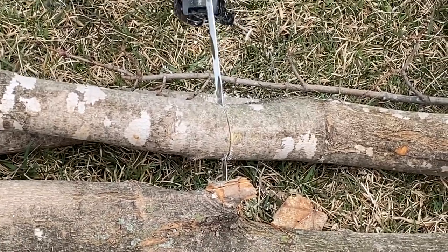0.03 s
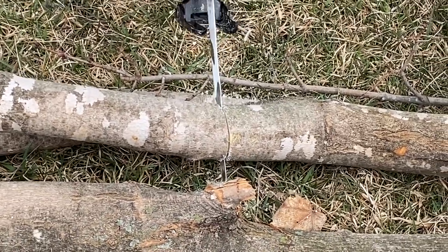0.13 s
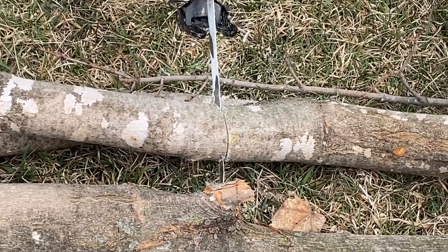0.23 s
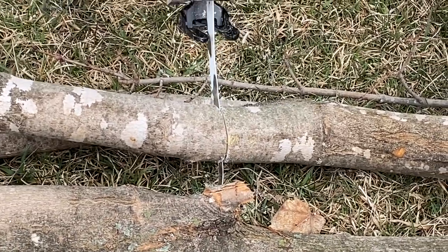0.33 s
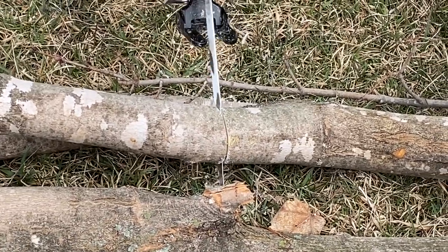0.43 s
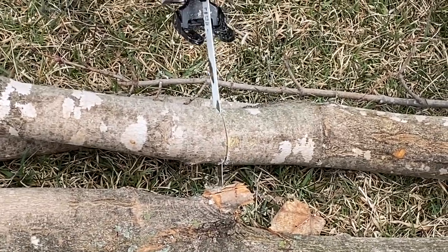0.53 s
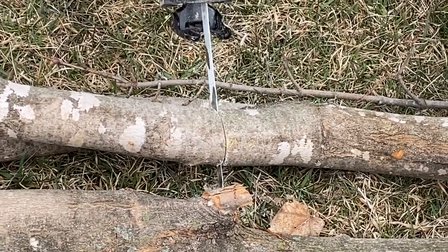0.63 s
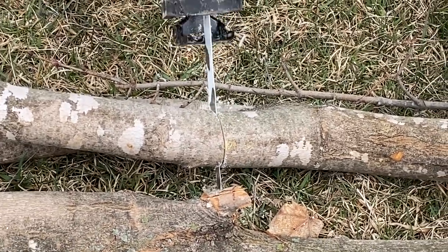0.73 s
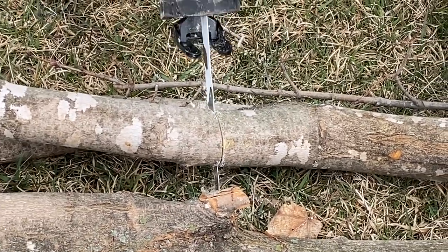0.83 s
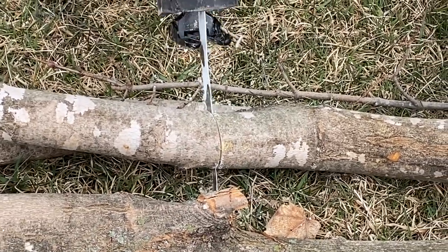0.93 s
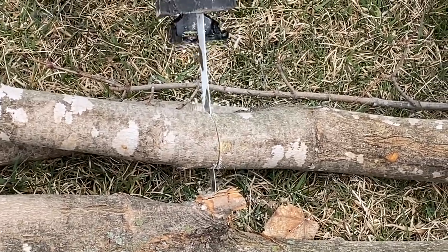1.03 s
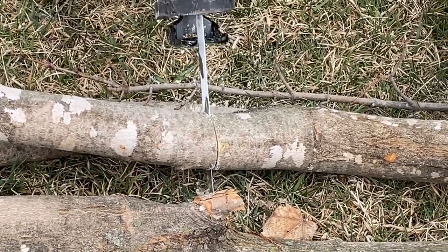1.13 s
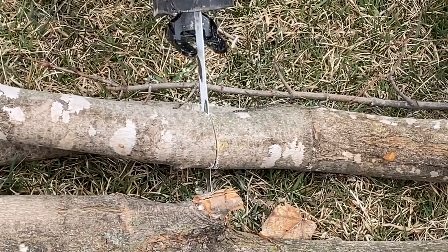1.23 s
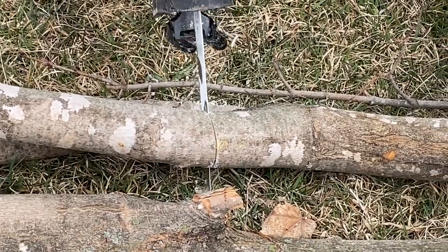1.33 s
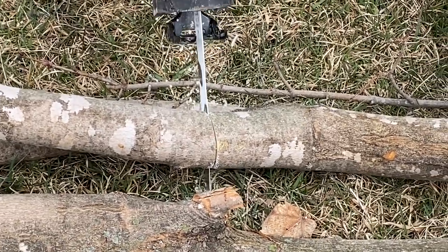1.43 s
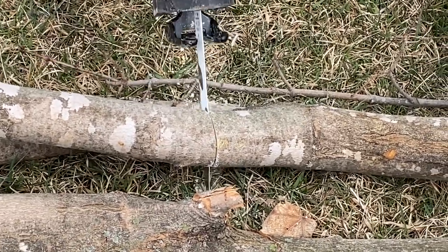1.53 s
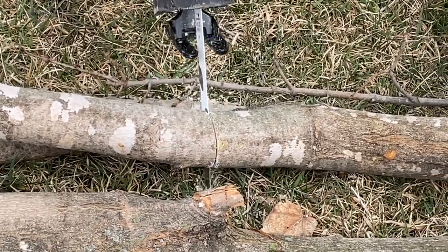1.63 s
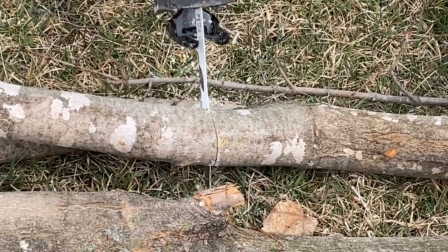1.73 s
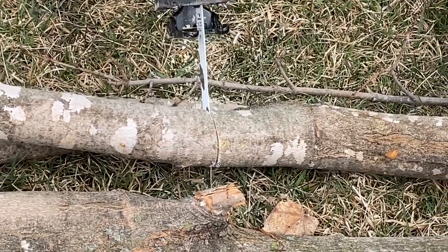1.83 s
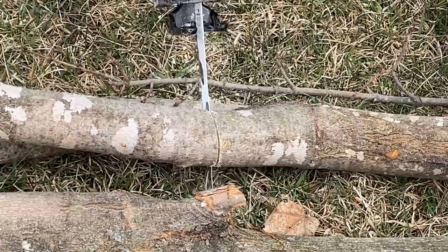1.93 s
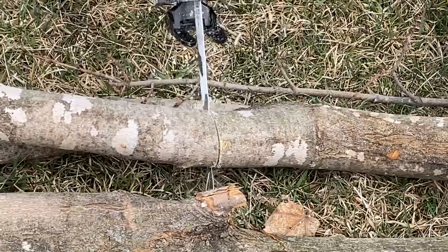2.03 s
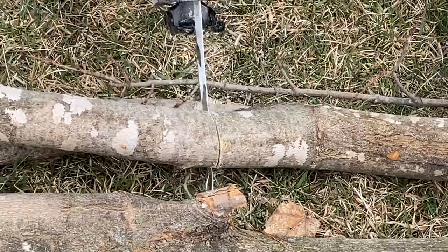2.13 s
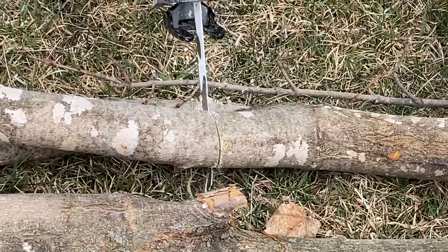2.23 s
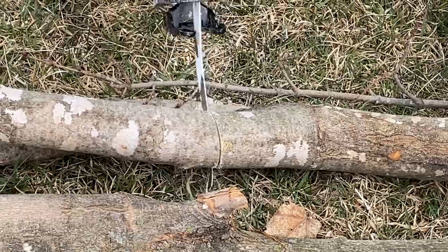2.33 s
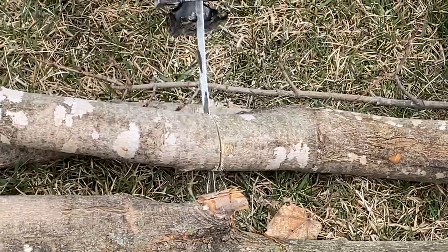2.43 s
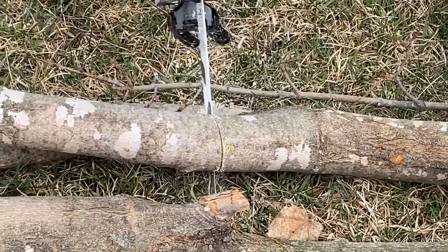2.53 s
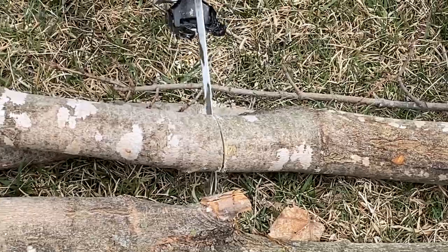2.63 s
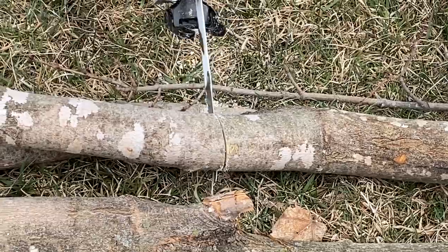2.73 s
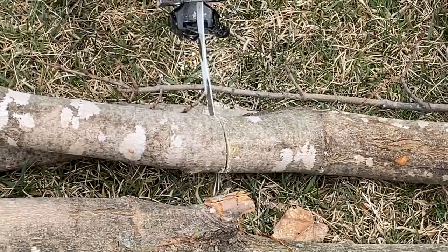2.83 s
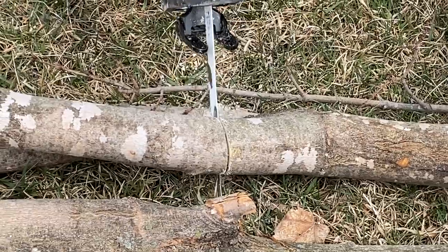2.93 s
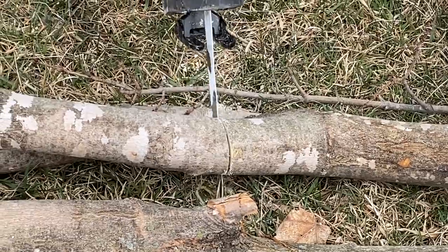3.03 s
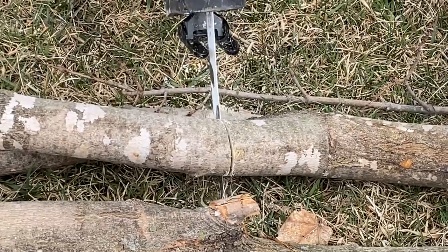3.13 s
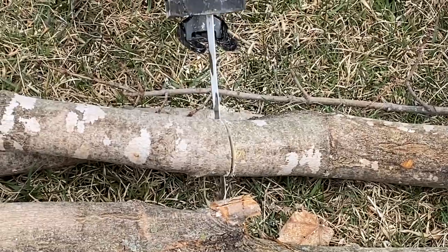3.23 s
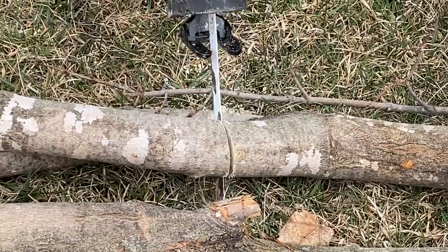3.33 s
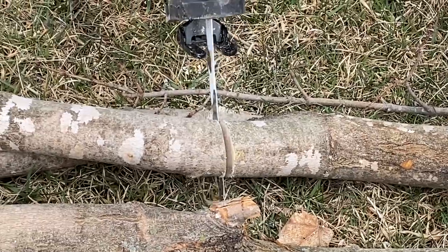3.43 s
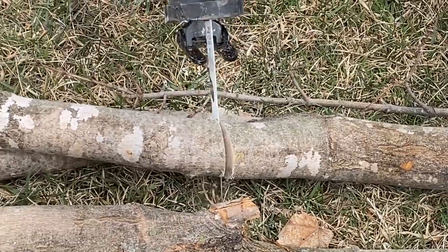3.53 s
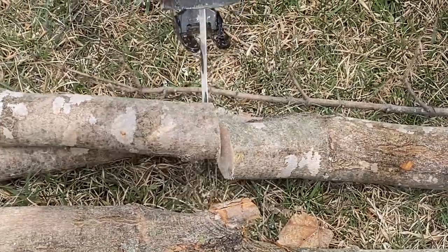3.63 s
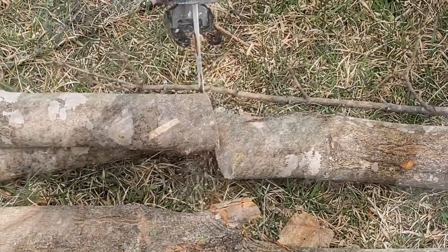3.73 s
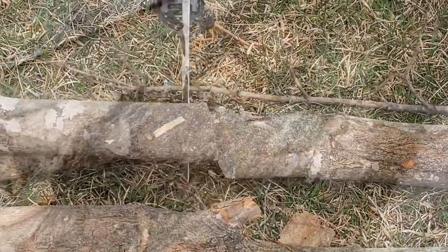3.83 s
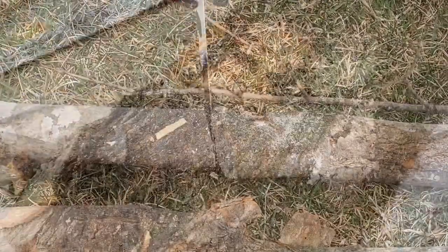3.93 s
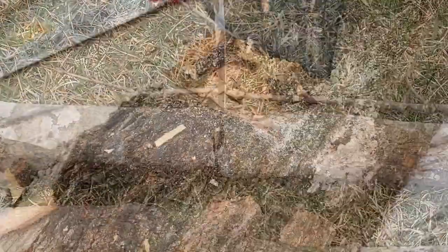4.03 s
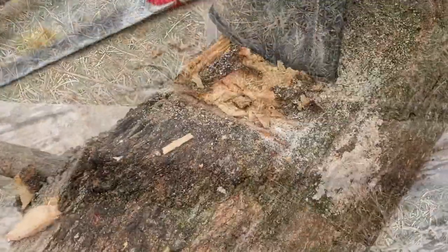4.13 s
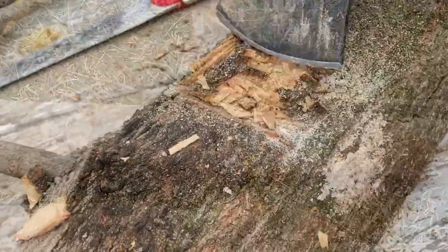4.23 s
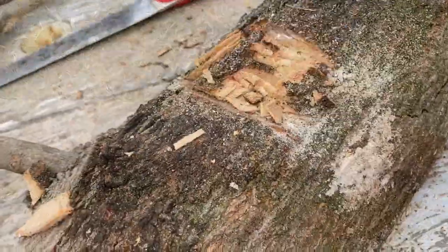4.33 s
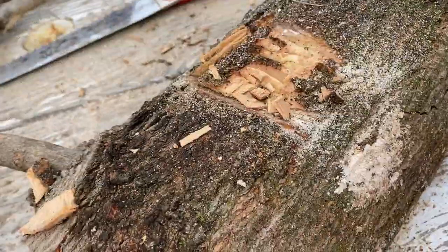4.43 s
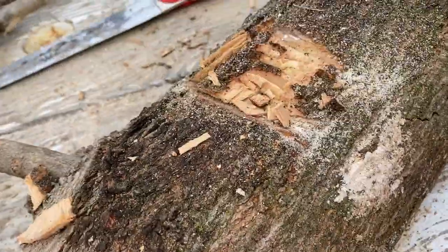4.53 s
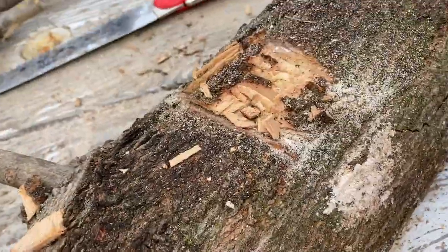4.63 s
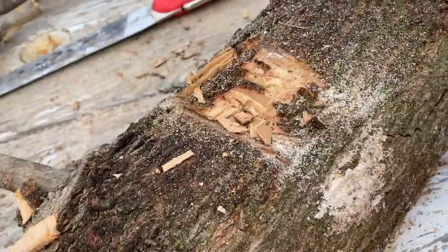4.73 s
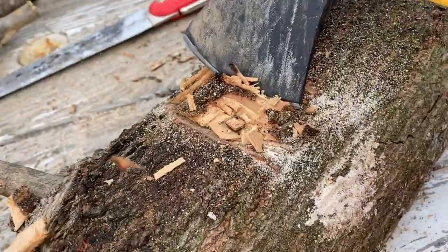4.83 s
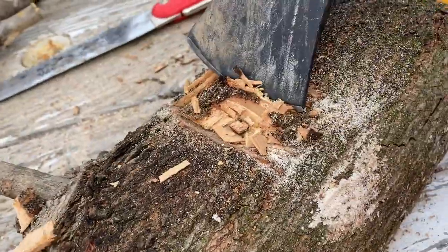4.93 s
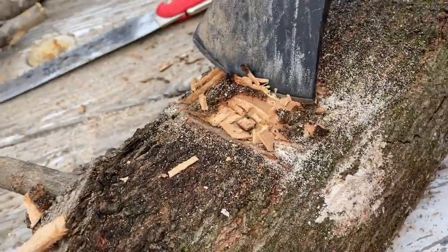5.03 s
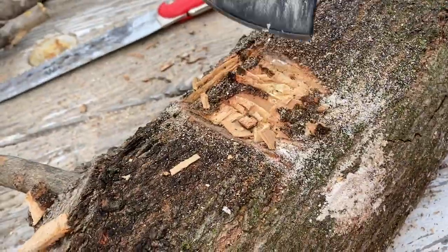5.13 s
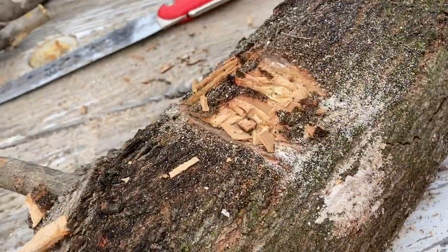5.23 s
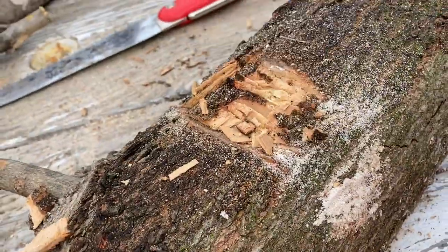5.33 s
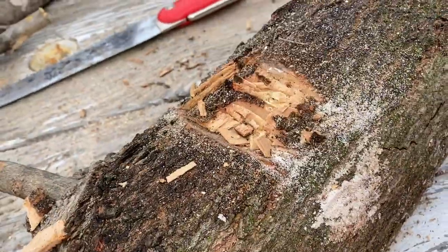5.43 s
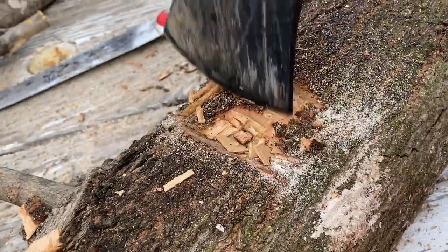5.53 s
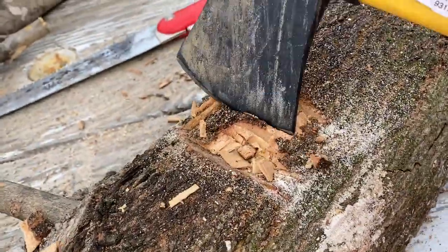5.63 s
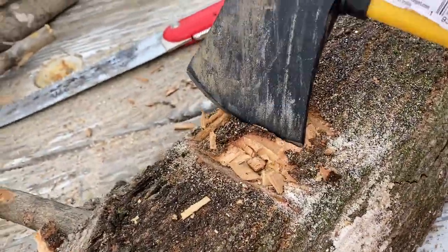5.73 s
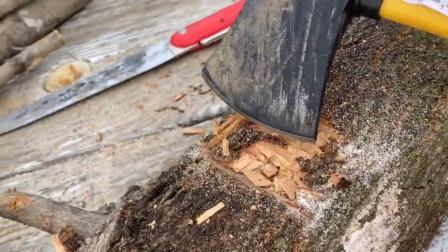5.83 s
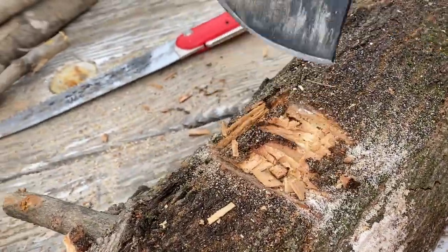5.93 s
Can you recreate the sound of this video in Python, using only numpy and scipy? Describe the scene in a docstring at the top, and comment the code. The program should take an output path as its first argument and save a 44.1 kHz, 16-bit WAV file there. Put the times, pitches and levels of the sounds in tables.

```python
"""First comes the rattling buzz of a reciprocating saw cutting a branch, close to a phone on a lawn.
Each turn of its crank knocks at both ends of the stroke, whips the blade and drags the teeth through
the cut, while puffs of air thud on the microphone. The saw fades out. Three hatchet chops into a log
on a wooden deck overload the microphone, and splinters crackle. Behind it all the yard rumbles
softly, and a far bird chirps once."""
import sys
import numpy as np
from scipy import signal
from scipy.fft import rfft, irfft
from scipy.io import wavfile
from scipy.ndimage import map_coordinates

SR = 44100
rng = np.random.default_rng(int(sys.argv[2]) if len(sys.argv) > 2 else 0)


def wrap_up_sound(samples):
    """Save the sound to the file named by the first command line argument, as 16-bit audio."""
    columns = np.atleast_2d(samples).T
    # keep every value between -1 and 1, then stretch to whole-number steps
    tamed = np.clip(columns, -1, 1)
    steps = np.round(tamed * 32767).astype(np.int16)
    wavfile.write(sys.argv[1], SR, steps)


N = 264600
T = np.arange(N) / SR
FREQ = np.maximum(np.arange(N // 2 + 1) * SR / N, 1)

# tone of the yard's rumble, of rustling and of air on the microphone: (frequency [Hz], level [dB])
RUMBLE_COLOUR = [(20, -15.5), (40, 3.5), (65, 8.5), (110, 0.5), (200, -10), (400, -25), (800, -37.5),
                 (2000, -69.5)]
RUSTLE_COLOUR = [(200, 0), (700, 5), (1200, 1), (2000, 3), (3200, -1.5), (4500, -3), (6500, -1),
                 (9000, -15.5), (11000, -5.5), (16000, -18)]
BUFFET_COLOUR = [(15, -22), (35, -14), (65, 2), (100, -6.5), (150, -7.5), (250, -17), (500, -36.5),
                 (1500, -77.5)]
# a far bird's chirp: (time [s], pitch [Hz], level [dB])
BIRD = [(5.305, 3700, -91), (5.318, 3900, -58), (5.333, 4700, -68), (5.347, 3930, -49), (5.362, 3450, -54),
        (5.378, 3300, -87)]
# puffs of air on the microphone: (time [s], level [dB], half-width [s])
PUFFS = [(.745, -22, 0.021), (.99, -24.5, 0.029), (1.065, -22, 0.029), (1.18, -17.5, 0.03),
         (1.3, -23.5, 0.039), (1.529, -12, 0.016), (1.92, -18.5, 0.092), (2.105, -15, 0.024),
         (2.17, -15.5, 0.021), (2.45, -15, 0.016), (2.695, -13, 0.016), (2.79, -19, 0.096),
         (2.944, -15.5, 0.028), (3.34, -24.5, 0.013), (3.49, -30.5, .018), (3.71, -27, 0.029),
         (3.84, -27, 0.089)]

# hatchet blows: (time [s], thump [dB], crack [dB], crack brightness [dB per octave], log pitch [ratio],
# splinters [dB], after-ring [dB], bounce delay [s], bounce [dB], rocking [dB])
CHOPS = [(4.045, -0.5, -6.5, 0.1, 0.98, -34, -38, 0.051, -13.5, -22),
         (4.7673, 5, 4.5, -.5, .995, -28.5, -40, .044, -17, -25.5),
         (5.5399, 2.5, -2.5, 2.5, 1.06, -32, -33, 0.051, -23, -36)]
# ringing notes of the log on its boards, the long, low after-ring and the steel head:
# (pitch [Hz], level [dB], time to fade by 60 dB [s])
LOG_MODES = [(63, -6, 0.17), (81.5, -2, 0.16), (111.2, -3.5, 0.19), (167.4, -6, 0.17), (198.6, -3, 0.069),
             (311.5, -9, 0.14), (404, -19, 0.14), (546, -6, 0.058), (636, -7, 0.058), (747, -5.5, 0.047),
             (1230, -13, 0.016), (1516, -30.5, 0.09), (3800, -41, 0.002)]
AFTER_RING = [(275, -0.5, 1.7), (294, 2.5, 1.45), (419, -11.5, 1.5)]
STEEL_MODES = [(1776, -14, .15), (2875, -4, .18), (3402, -2, .18), (4134, -4, .2), (6054, -18, .35),
               (10800, -2, .16)]
# tone of the wood cracking and of its chips: (frequency [Hz], level [dB])
CRACK_COLOUR = [(200, -21), (700, 11.5), (1500, 3), (2500, 0), (3600, 8.5), (4700, -2), (7500, 4),
                (11000, -4), (16000, 3)]
CHIP_COLOUR = [(300, -16), (1000, -5.5), (2000, 2), (3000, -6), (5000, -7.5), (8000, -14), (16000, -9.5)]
# bark and chips snapping or landing: (time [s], level [dB], extra level for the dull tap [dB])
CHIPS = [(3.963, -30.5, -14), (4.084, -25, 23.5), (4.120, -46, 27), (4.1803, -33, -6), (4.389, -39, -17),
         (4.406, -46, 18), (4.448, -37.5, -11), (4.4897, -38, -20), (4.781, -18, -1), (4.8176, -10.5, -6),
         (4.8373, -19, -7), (5.3804, -37, -10), (5.5896, -24, -4), (5.8184, -34, -4)]
# the steel twangs as it comes free of the wood: (time [s], level [dB])
TWANGS = [(5.059, -62), (5.785, -56), (5.815, -46)]
# the hatchet rubs out of the notch and is lifted: (time [s], level [dB], half-width [s])
LIFTS = [(4.21, -51, 0.11), (5.0, -50.5, 0.085), (5.81, -46.5, 0.057)]

# crank speed, rising as the cut opens: (time [s], stroke rate [Hz])
STROKE_RATE = [(0.0, 30.1), (0.14, 30.552), (0.33, 32.316), (0.535, 32.51), (0.865, 30.431),
               (1.164, 30.644), (1.276, 30.231), (1.714, 30.569), (2.214, 31.192), (2.462, 32.465),
               (2.821, 31.819), (3.08, 35.131), (3.365, 35.394), (3.759, 38.689), (3.85, 38.615)]
# loudness of the saw: (time [s], level [dB])
SAW_LEVEL = [(0, -15.5), (.55, -14.5), (.9, -15.5), (1.55, -15.5), (2, -15), (2.7, -14), (3.2, -16.5),
             (3.47, -13.5), (3.65, -17.5), (3.8, -16.5)]
# the shoe, the saw's metal rest, slaps the branch as the cut deepens: (time [s], relative level [dB])
SHOE_LEVEL = [(0, -17.5), (1.8, -15), (2.5, -5), (2.85, -9), (3.05, -2.5), (3.3, -1.5), (3.47, -5.5),
              (3.62, -3.5), (3.9, -3)]
# the hand leans on the saw and the push knock rings harder: (time [s], boost [dB])
LEANS = [(1.1, 5.5), (1.83, 1.5), (2.62, 2.5), (3.11, 8.5)]
# ringing notes of the pull knock, push knock, shoe, whipping blade and blade in its cut (the kerf):
# (pitch [Hz], width [Hz], level [dB])
PULL_MODES = [(645, 390, 3), (802, 220, 7), (1300, 62, 0), (1900, 500, -14), (2355, 150, 3.5),
              (3380, 1500, -7), (6000, 5900, -21)]
PUSH_MODES = [(1500, 730, -22), (3203, 130, 4), (3410, 113, 6), (7000, 5300, -36.5)]
SHOE_MODES = [(810, 430, -3), (1027, 100, 4), (1272, 66, 3), (1800, 360, -2), (2307, 220, -1.5),
              (3320, 650, -7.5), (6070, 1500, -13)]
WHIP_MODES = [(942, 62, 0), (1335, 82, -15)]
KERF_MODES = [(1320, 81, 2.5), (1635, 79, -2), (1949, 85, 3), (2190, 220, -6), (2640, 98, -5.5),
              (2877, 40, -2), (4360, 300, -6.5), (4690, 370, -5), (4920, 320, -4.5), (6010, 130, -7),
              (6300, 140, -12.5), (7340, 370, -7.5), (10110, 540, -6), (14400, 6300, -16)]
# tone of the rasping teeth and of the shaking housing: (frequency [Hz], level [dB])
RASP_COLOUR = [(300, -12), (600, 0.5), (1100, 0), (2000, 0), (2700, -8), (3400, -4.5), (4000, -9),
               (7000, -14), (8500, -14.5), (10700, -13.5), (13300, -19.5), (14700, -12), (16000, -17)]
HOUSING_COLOUR = [(60, -24.5), (130, -16), (180, -5.5), (250, -7.5), (380, -1), (460, -6), (600, -3),
                  (1000, -12.5), (2000, -41.5)]
# hum of the drive: (pitch [multiple of the stroke rate], relative level [dB])
DRIVE_HUM = [(5, -21), (6, -28.5), (9, -27), (11, -26), (18, -19)]
# how the saw reaches the two microphone openings: (frequency [Hz], left's lead [radians])
PORT_PHASE = [(0, 0), (700, .3), (1400, .9), (2150, 0), (7500, 0), (9100, -3.1), (13300, -9.4),
              (16000, -12.8)]
# and how much louder it is on the left: (frequency [Hz], left minus right [dB])
PORT_BALANCE = [(100, 1), (380, 2.5), (700, 5), (1290, 3), (2380, 1), (16000, -4)]


def undb(db):
    """Turn decibels into a multiplier."""
    return 10 ** (np.asarray(db) / 20)


def unit(x):
    """Scale to an average (rms) strength of 1."""
    return x / np.sqrt(np.mean(x ** 2))


def curves(rows):
    """Each column of a table as a line through time."""
    times, *columns = np.transpose(rows)
    return [np.interp(T, times, column) for column in columns]


def hump(s, width_s):
    """A smooth rise to 1 at time s and an equal fall."""
    return np.exp(-((T - s) / width_s) ** 2)


def swell(age, rise):
    """A quick climb to 1 when age reaches rise, then a slower fall."""
    x = np.maximum(age, 0) / rise
    return x * np.exp(1 - x)


def noise(side):
    """Stereo hiss; side sets how much left and right differ."""
    mid, apart = rng.standard_normal((2, N))
    return mid + side * apart * np.array([[1], [-1]])


def grit(spread_db, size=24):
    """Uneven strengths of breaking wood fibres, each lasting size samples."""
    thickness = np.minimum(rng.exponential(size=N // size + 1), 3.5)
    return unit(np.repeat(undb(spread_db * thickness), size)[:N])


def colour(x, points):
    """Shape a sound's tone by (frequency [Hz], level [dB]) points; plain hiss keeps its loudness."""
    hz, db = np.transpose(points)
    gain = unit(undb(np.interp(np.log(FREQ), np.log(hz), db)))
    return irfft(rfft(x) * gain, N)


def resonate(force, modes):
    """Let a force set an object's notes (its modes) ringing."""
    return sum((-1) ** k * undb(db) * signal.lfilter(*signal.iirpeak(hz, hz / width, SR), force)
               for k, (hz, width, db) in enumerate(modes))


def struck(s, modes, pitch=1, build_cycles=.3):
    """Notes struck at time s; each builds up at its own pace, so the low ones come late."""
    out, start = np.zeros(N), int(s * SR)
    age = T[:min(N - start, SR)]
    for k, (hz, db, t60) in enumerate(modes):
        fade = np.exp(-np.log(1000) * age / t60) * (1 - np.exp(-age * hz / build_cycles))
        tone = np.sin(2 * np.pi * hz * pitch * age)
        out[start:start + len(age)] += (-1) ** k * undb(db) * fade * tone
    return out


def yard():
    """Soft outdoor rumble and rustle, swelling as the log rocks and as the arm swings and lifts."""
    rocking = sum(undb(db) * swell(T - s, rise=.053) for s, *_, db in CHOPS)
    swings = undb(-50.5) * sum(hump(s - .068, width_s=.095) for s, *_ in CHOPS)
    lifts = sum(undb(db) * hump(s, width) for s, db, width in LIFTS)
    rumble = colour(noise(side=.3), RUMBLE_COLOUR)
    rustle = colour(noise(side=.94) * grit(spread_db=2.5), RUSTLE_COLOUR)
    return np.hypot(undb(-41.5), rocking) * rumble + np.hypot(undb(-58.5), swings + lifts) * rustle


def bird():
    """One far chirp: a whistle that slides up and back down."""
    hz, db = curves(BIRD)
    calling = (T > BIRD[0][0]) & (T < BIRD[-1][0])
    return undb(db - 1) * np.sin(2 * np.pi * np.cumsum(hz) / SR) * calling


def wind():
    """A light breeze rises and falls once, and puffs of air thud on the microphone."""
    breeze = undb(-27.5) * hump(1.98, width_s=1.5)
    puffs = sum(undb(db) * hump(s, width) for s, db, width in PUFFS)
    return colour(noise(side=.21), BUFFET_COLOUR) * np.hypot(breeze, puffs)


def chips():
    """Bits of bark snap off and land; the steel twangs as it is worked loose."""
    tick = sum(undb(db) * swell(T - s, rise=.0014) for s, db, _ in CHIPS)
    tap = sum(undb(db + dull_db) * swell(T - s, rise=.0013) for s, db, dull_db in CHIPS)
    ticks = undb(-7) * colour(noise(side=.54) * tick, CHIP_COLOUR)
    taps = undb(-17) * colour(noise(side=.39) * tap,
                              [(100, -8.5), (450, -8), (900, -7), (2500, -25.5), (8000, -50.5)])
    twangs = sum(undb(db) * struck(s, STEEL_MODES) for s, db in TWANGS)
    return ticks + taps + twangs


def chops():
    """The edge cracks into the wood, the log booms and bounces, and fibres tear until the edge stops."""
    ringing, tearing, rattle, rush = np.zeros((4, N))
    crack, fibres = np.zeros((2, N)), noise(side=1)
    for s, thump_db, crack_db, bright_db, pitch, splinter_db, ring_db, delay, bounce_db, _ in CHOPS:
        ringing += undb(thump_db) * struck(s + .00079, LOG_MODES, pitch, build_cycles=.39)
        ringing += undb(bounce_db) * struck(s + delay, LOG_MODES, pitch, build_cycles=4.5)
        ringing += undb(ring_db) * struck(s, AFTER_RING, pitch)
        ringing += undb(-35.5) * struck(s, STEEL_MODES)
        tilted = [(hz, db + bright_db * np.log2(hz)) for hz, db in CRACK_COLOUR]
        crack += undb(crack_db) * colour(fibres * swell(T - s, rise=.0011), tilted)
        edge_moving = np.clip((s + .096 - T) / .012, 0, 1)
        tearing += undb(splinter_db) * swell(T - s, rise=.02) * edge_moving
        rattle += undb(thump_db) * swell(T - s, rise=.02)
        # the head pushes air ahead of it just before it lands
        rush += swell(s + .0012 - T, rise=.0038)
    board_colour = [(40, -3.5), (100, 1), (300, -2.5), (500, -11.5), (900, -31), (2500, -50), (8000, -71)]
    boards = undb(-17) * colour(noise(side=.73) * rattle, board_colour)
    splinters = colour(noise(side=.68) * tearing * grit(spread_db=6.5, size=36), CHIP_COLOUR)
    air = undb(-30) * colour(noise(side=.4) * rush,
                             [(100, 1), (400, -4.5), (1500, -8), (5000, -15), (16000, -47)])
    lean_left = undb([[1.8], [-1.8]])
    return ringing * lean_left + boards + crack + splinters + air


def clatter(turn, memory, size=1400):
    """Roughness met again on every crank turn; memory (0 to 1) is how alike the turns are."""
    rough = rng.standard_normal((int(turn[-1]) + 2, size))
    for k in range(1, len(rough)):
        rough[k] = memory * rough[k - 1] + np.sqrt(1 - memory ** 2) * rough[k]
    return map_coordinates(rough.ravel(), [turn * size], order=3)


def ping(turn, at, jitter, scatter_db):
    """The force of one steel-on-steel blow a turn, never at quite the same place or strength."""
    shift, strength = rng.standard_normal((int(turn[-1]) - 1, 2)).T
    hits = np.searchsorted(turn, np.arange(len(shift)) + at + jitter * shift)
    force = np.zeros(N + 1)
    force[hits] = undb(scatter_db * strength)
    return force[:N]


def knock(turn, modes, at, length, memory, scatter_db):
    """Loose parts meet once a turn and rattle briefly, harder on some strokes than on others."""
    stroke = np.floor(turn - at).astype(int) + 1
    force = undb(scatter_db * rng.standard_normal(N // 100))[stroke]
    dying = np.exp(-(((turn - at) % 1) / length) ** 2)
    return unit(resonate(force * dying * clatter(turn, memory), modes))


def smooth_step(x, middle):
    """Glide from 0 to 1 as x passes the middle value."""
    return .5 + .5 * np.tanh(2 * (x - middle))


def blade_ring(force):
    """Deep in the cut less of the blade is free, so it rings a little higher."""
    short = smooth_step(T, 2.6)
    higher = [(hz * 1.023, width, db) for hz, width, db in PUSH_MODES]
    return unit(resonate(force * (1 - short), PUSH_MODES) + resonate(force * short, higher))


def stroke_knocks(blade, rate, load_db):
    """The drive knocks at both ends of the stroke; each knock softens once the saw runs free."""
    pull_free_hz, push_free_hz, drop_db = 32.8, 39.4, 5
    lean_db = sum(db * hump(s, width_s=.08) for s, db in LEANS)
    pull_db = load_db - drop_db * smooth_step(rate, pull_free_hz)
    push_db = load_db - drop_db * smooth_step(rate, push_free_hz) + lean_db
    blow = undb(-6) * unit(resonate(ping(blade, at=.538, jitter=.002, scatter_db=.7), PULL_MODES))
    rattle = undb(-9.5) * knock(blade, PULL_MODES, at=.535, length=.14, memory=.92, scatter_db=.5)
    push = undb(-8.2) * blade_ring(ping(blade, at=.06, jitter=.005, scatter_db=1.4))
    return undb(pull_db) * (blow + rattle) + undb(push_db) * push


def blade_whip(turn):
    """The blade bends sideways once each way, harder on the way back while the cut pinches it."""
    outward = unit(resonate(ping(turn, at=.185, jitter=.008, scatter_db=2), WHIP_MODES))
    back = unit(resonate(ping(turn, at=.615, jitter=.006, scatter_db=1.5), WHIP_MODES))
    pinch_db = 9 * hump(2.27, width_s=.55)
    return undb(-8) * outward + undb(-14.5 + pinch_db) * back


def teeth(turn, blade, shoe_db):
    """The teeth bite hardest twice a turn: they rasp, ring the blade and shake the housing."""
    bite = .55 + .45 * swell((blade - .03) % 1, rise=.11) + .75 * swell((blade - .53) % 1, rise=.06)
    rasp = undb(-2) * unit(colour(bite * grit(spread_db=2.5) * clatter(turn, memory=.23), RASP_COLOUR))
    kerf = undb(-6) * unit(resonate(bite * grit(spread_db=5.5) * clatter(turn, memory=.22), KERF_MODES))
    # deeper in the cut the walls rub the blade and keep it singing
    singing = undb(.4 * shoe_db - 7) * blade_ring(bite * clatter(turn, memory=.41))
    housing = undb(-12) * unit(colour(bite * clatter(turn, memory=.844), HOUSING_COLOUR))
    return rasp + kerf + singing + housing


def saw():
    """One crank times every part of the saw; places and lengths along its path are counted in turns."""
    rate, shoe_db = curves(STROKE_RATE)[0], curves(SHOE_LEVEL)[0]
    turn = np.cumsum(rate) / SR
    blade = turn - .11 * np.minimum(T / STROKE_RATE[-1][0], 1) ** 3  # lags more as the cut goes on
    load_db = -.55 * (rate - 30)  # knocks and whip soften as the crank speeds up
    knocks = stroke_knocks(blade, rate, load_db)
    shoe = undb(shoe_db) * knock(turn, SHOE_MODES, at=.94, length=.16, memory=.85, scatter_db=.6)
    whip = undb(load_db) * blade_whip(turn)
    cutting = teeth(turn, blade, shoe_db)
    hum = sum(undb(db) * unit(np.sin(2 * np.pi * (k * turn + rng.random()))) for k, db in DRIVE_HUM)
    fade_start_s, fade_db_per_s = 3.803, 445
    saw_db = curves(SAW_LEVEL)[0] - fade_db_per_s * np.maximum(T - fade_start_s, 0)
    return (knocks + shoe + whip + cutting + hum) * undb(saw_db)


def microphone_ports(x):
    """The phone's two openings hear each frequency with their own timing and loudness."""
    phase = np.interp(FREQ, *np.transpose(PORT_PHASE))
    balance_db = np.interp(FREQ, *np.transpose(PORT_BALANCE))
    left, right = undb(balance_db / 2), undb(-balance_db / 2) * np.exp(-1j * phase)
    return irfft(rfft(x) * np.array([left, right]), N)


def scene():
    """Sawing in a breeze, then chopping, over the quiet yard."""
    return microphone_ports(saw()) + wind() + chops() + chips() + yard() + bird()


def record(dry):
    """The phone flattens peaks that are too loud and cuts the treble above 15750 Hz."""
    treble_cut = signal.ellip(10, .1, 70, 15750, fs=SR, output="sos")
    return signal.sosfilt(treble_cut, np.clip(dry, -1, 1))


dry = scene()
out = record(dry)
wrap_up_sound(out)
```